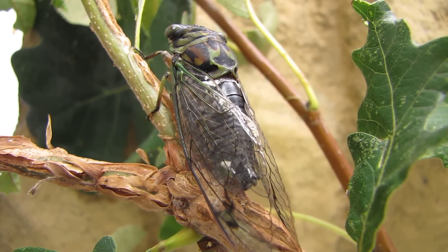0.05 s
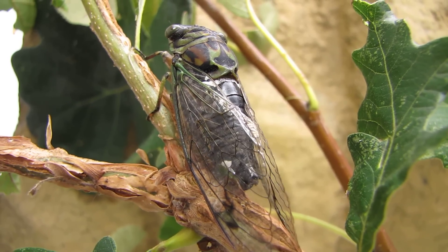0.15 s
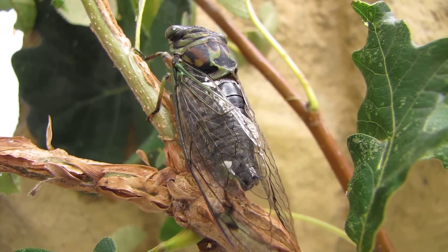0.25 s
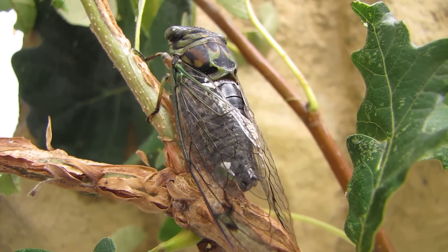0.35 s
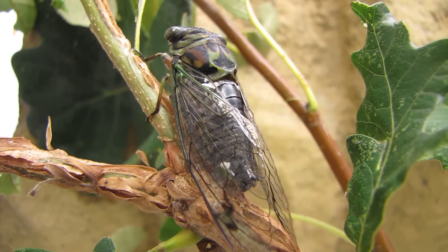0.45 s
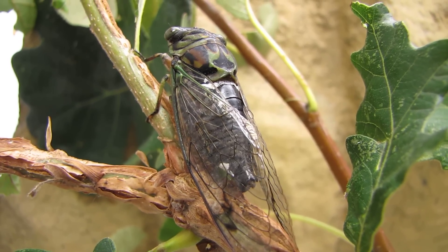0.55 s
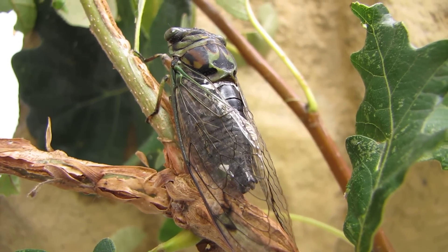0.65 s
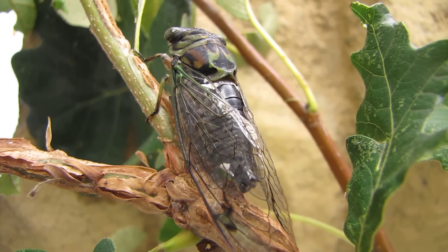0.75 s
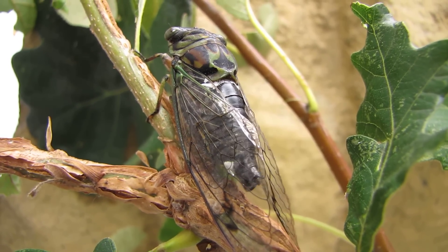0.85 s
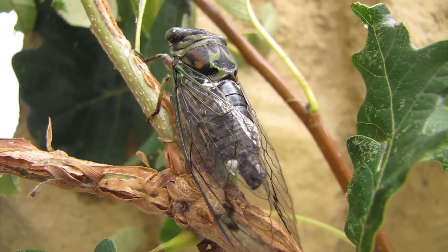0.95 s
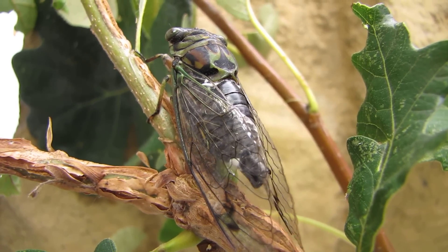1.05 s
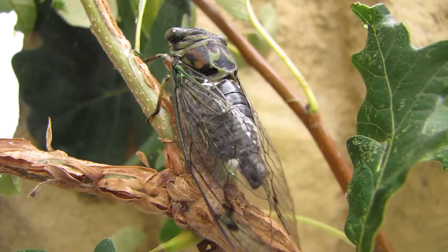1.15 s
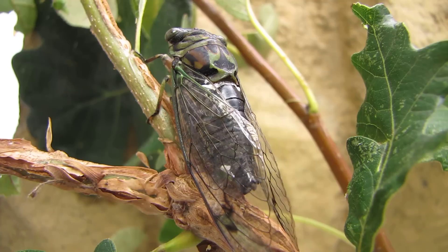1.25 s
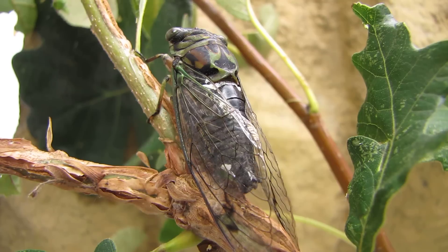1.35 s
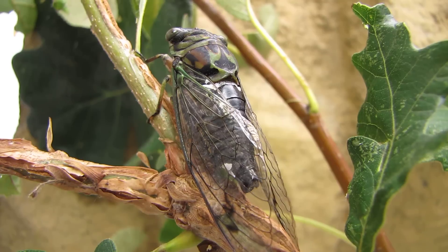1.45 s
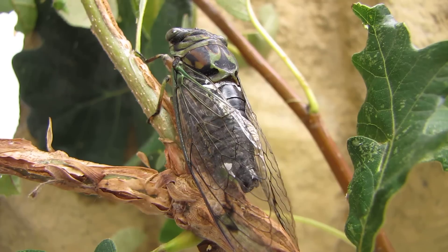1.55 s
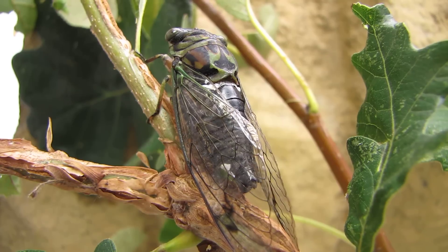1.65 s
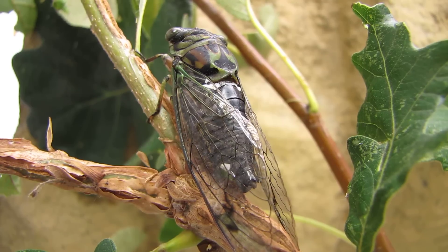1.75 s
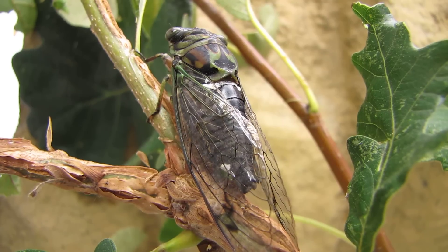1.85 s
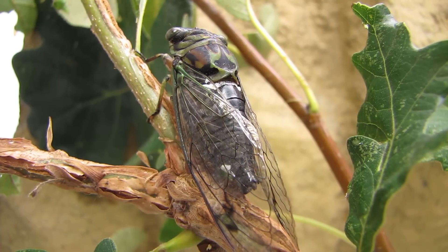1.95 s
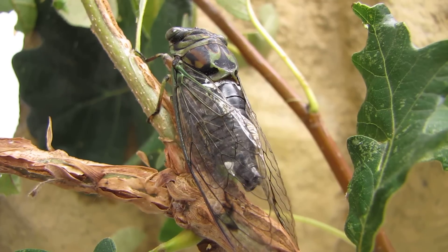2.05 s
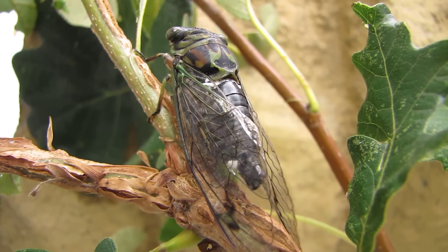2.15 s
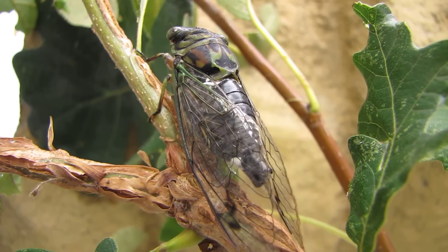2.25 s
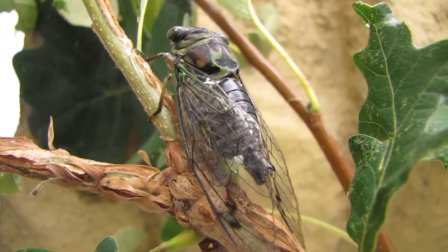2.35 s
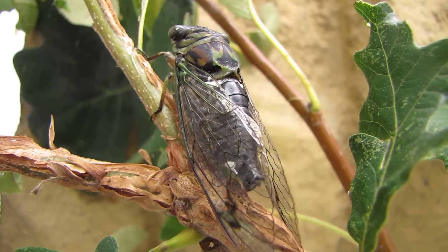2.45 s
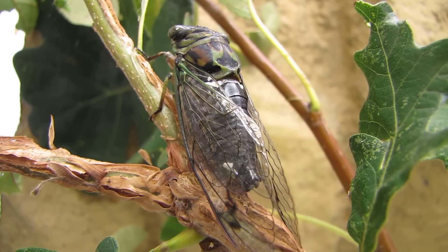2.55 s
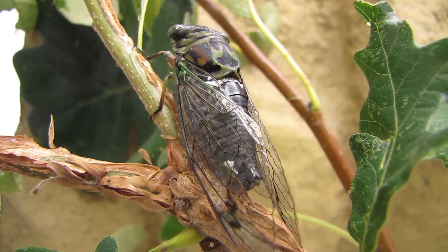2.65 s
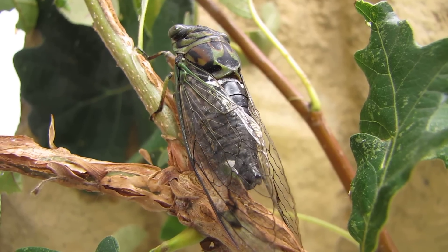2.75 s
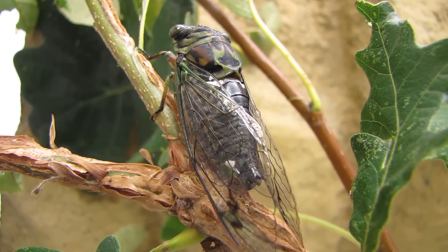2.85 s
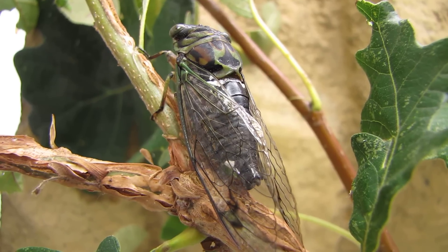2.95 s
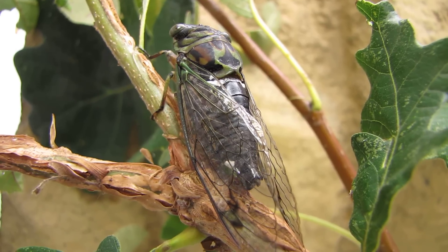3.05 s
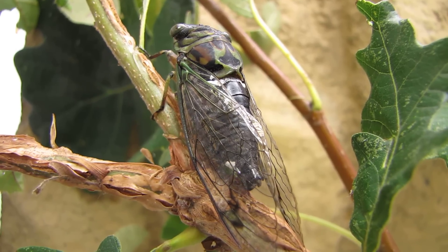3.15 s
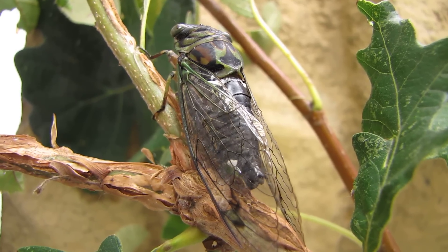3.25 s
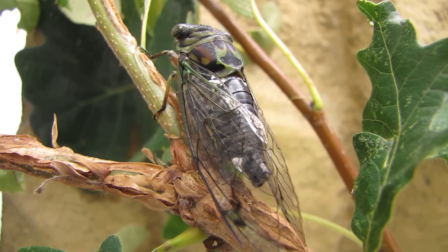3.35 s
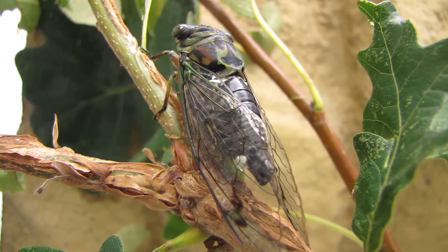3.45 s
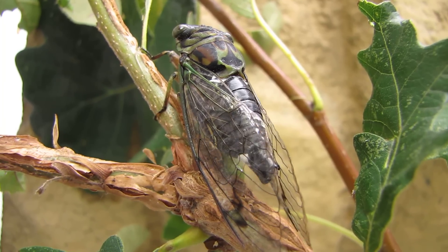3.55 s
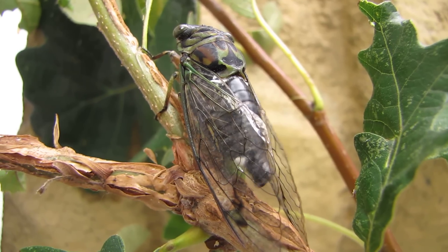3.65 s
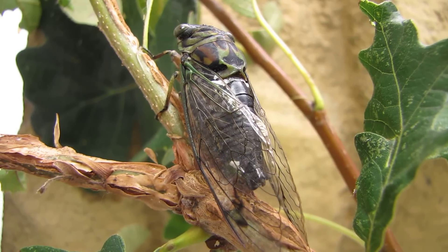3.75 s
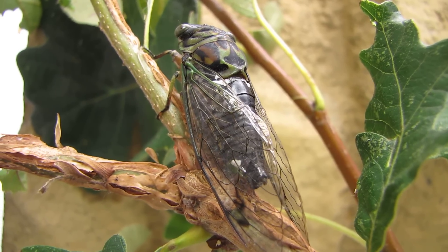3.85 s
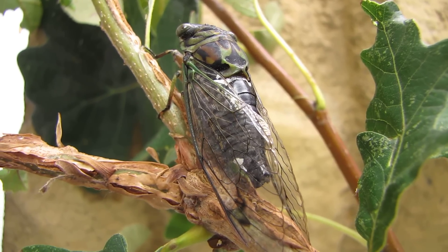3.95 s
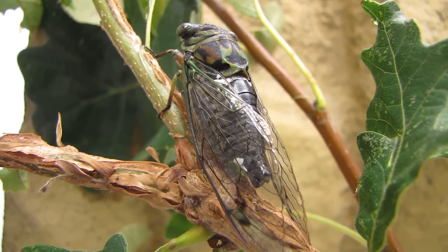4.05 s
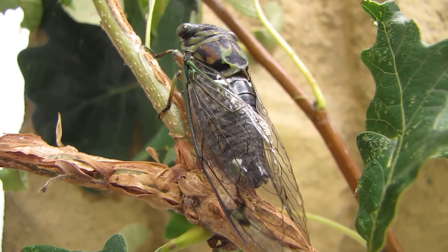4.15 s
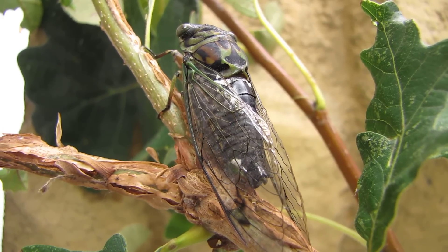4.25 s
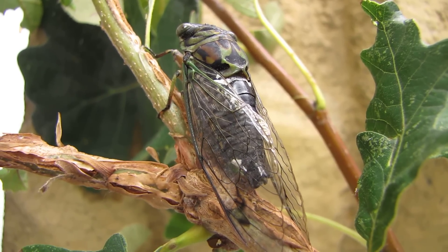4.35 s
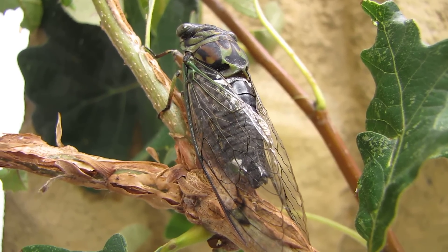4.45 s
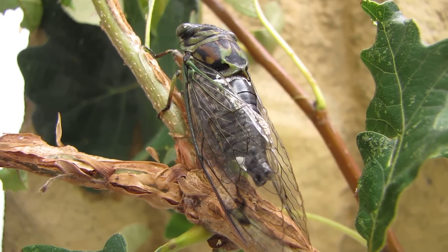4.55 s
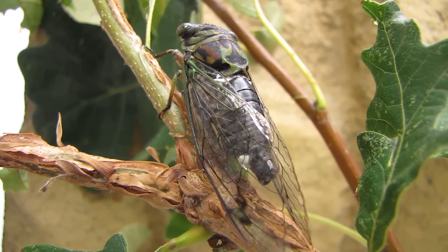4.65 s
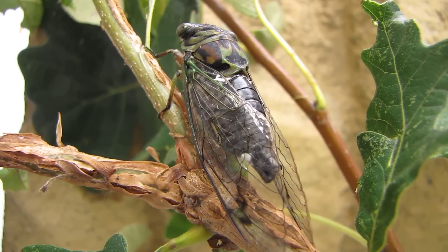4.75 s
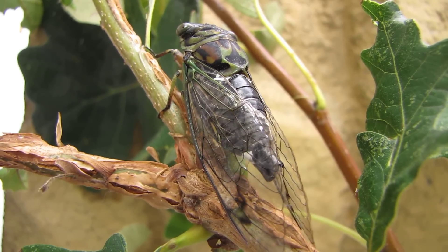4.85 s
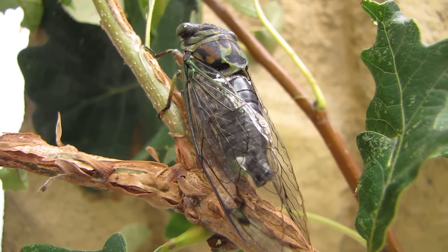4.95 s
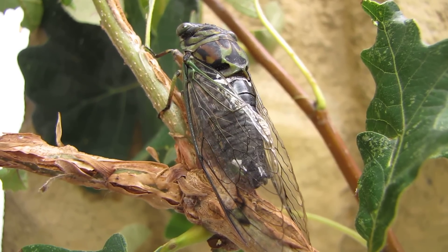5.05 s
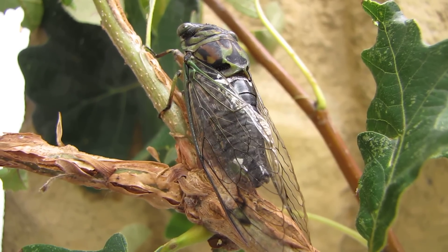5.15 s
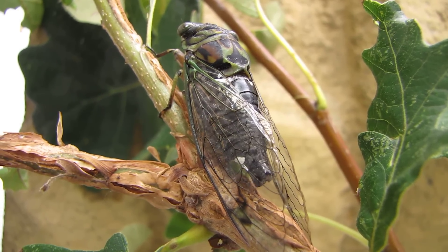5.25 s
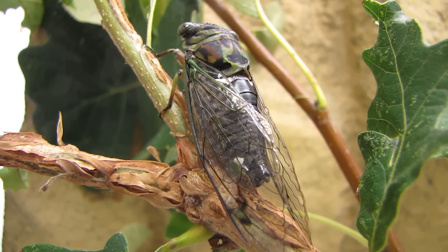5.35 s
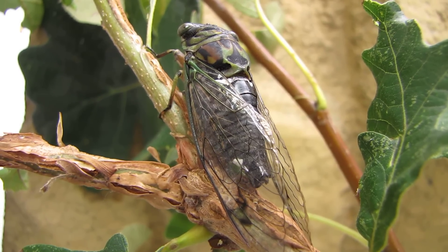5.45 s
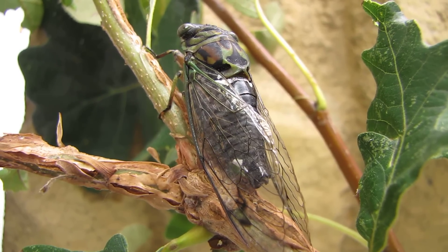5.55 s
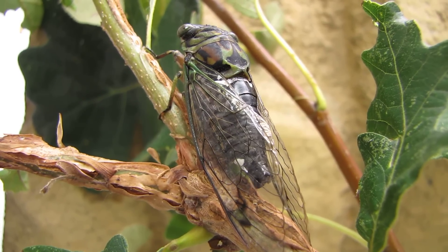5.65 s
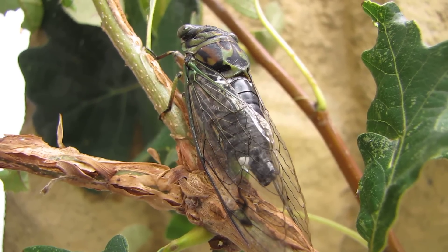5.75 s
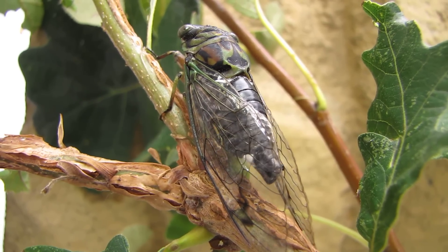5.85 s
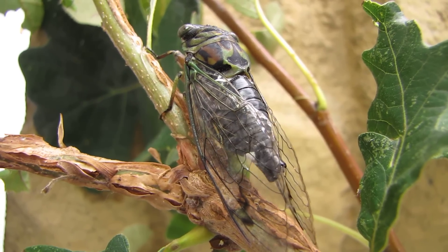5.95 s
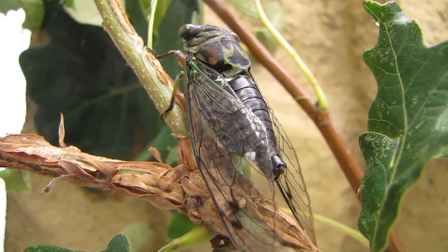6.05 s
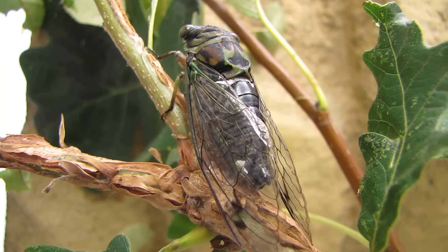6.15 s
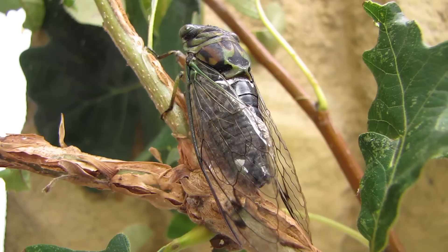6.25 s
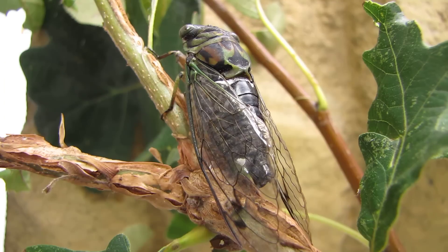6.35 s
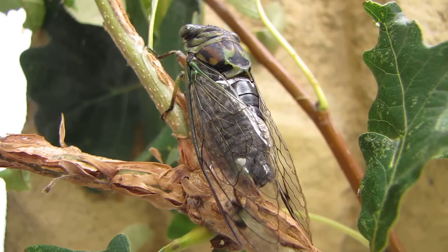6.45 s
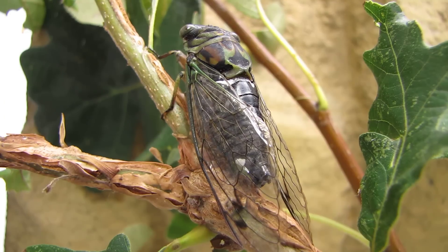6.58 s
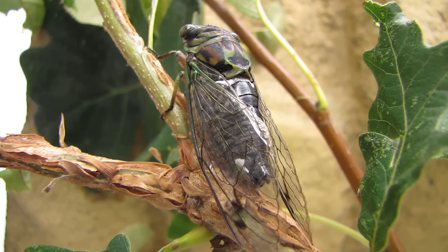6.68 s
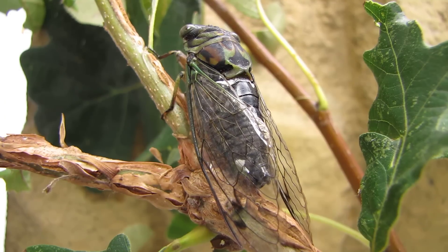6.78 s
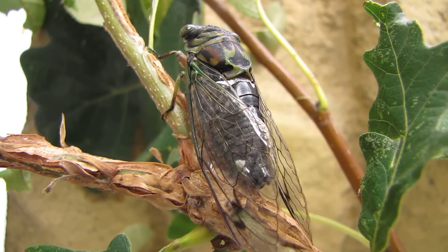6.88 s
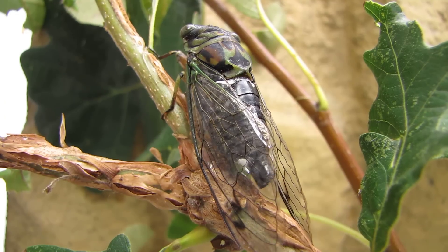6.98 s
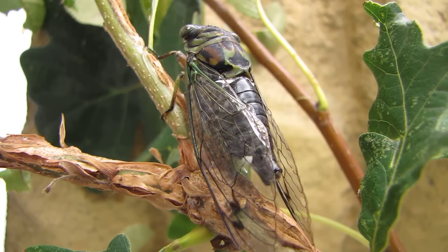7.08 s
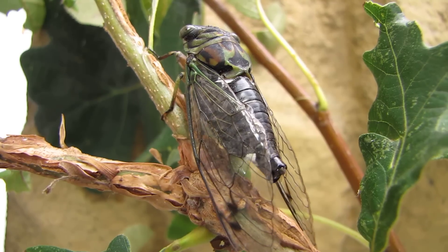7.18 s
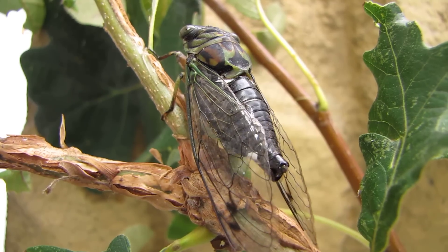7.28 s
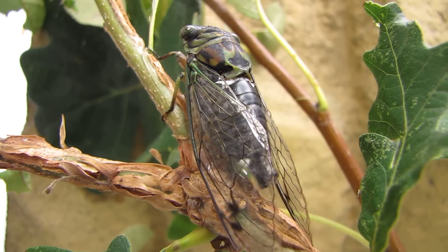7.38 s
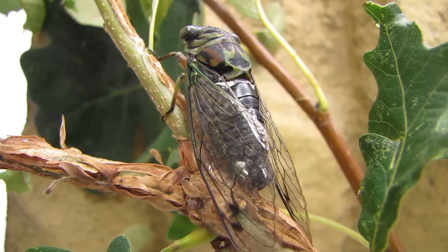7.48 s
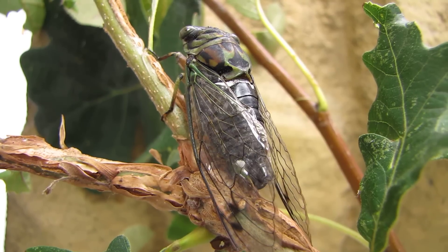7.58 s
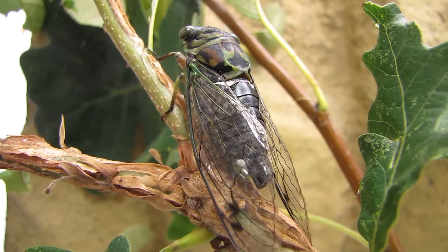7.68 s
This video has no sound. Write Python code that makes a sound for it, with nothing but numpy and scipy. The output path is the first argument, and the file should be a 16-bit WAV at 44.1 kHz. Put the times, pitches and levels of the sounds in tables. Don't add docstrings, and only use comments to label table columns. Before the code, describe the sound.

A close cicada sings six harsh, piercing phrases, each building from faint buzz to throbbing rattle, breaking off into slowing ticks.

```python
import sys
import numpy as np
from scipy import signal
from scipy.fft import rfft, irfft
from scipy.io import wavfile

SR = 44100
rng = np.random.default_rng(int(sys.argv[2]) if len(sys.argv) > 2 else 0)


def transcribe(u):
    v = np.clip(np.atleast_2d(u).T, -1, 1)
    q = np.round(v * 32767).astype(np.int16)
    wavfile.write(sys.argv[1], SR, q)


def undo_db(level):
    steps = np.asarray(level, float) / 20
    return 10 ** steps


N = 340452
TIME = np.arange(N) / SR

# (frequency [Hz], level per Hz [dB])
AIR_SPECTRUM = [(15, -9.5), (60, -4), (150, -8), (250, -7.5), (330, -14.5), (420, -24.5), (1000, -25),
                (1600, -37.5), (4000, -37.5), (9000, -48), (16000, -51)]
# (frequency [Hz], level [dB])
MACHINE_TONES = [(250, -72), (358, -85)]
# (start [s], length [s], pitch [Hz], level [dB])
DOVE_NOTES = [(-0.1, 0.39, 630, -86), (1.33, 0.39, 635, -85), (2.76, 0.41, 634, -84), (4.2, .36, 631, -82),
              (6.282, 0.15, 600, -80.5)]
# (start [s], length [s], first pitch [Hz], last pitch [Hz], level [dB])
SPARROW_CHIRPS = [(1.401, 0.15, 1850, 2250, -73), (1.447, .08, 2100, 2510, -76),
                  (2.63, .07, 1800, 2100, -85.5), (3.9, .1, 1500, 1393, -88),
                  (4.158, 0.16, 1855, 2300, -71), (6.511, 0.2, 1544, 2050, -76.5),
                  (6.59, 0.096, 2000, 2390, -76.5)]
# (start [s], pitch [Hz], level [dB])
CROW_CAW = (0.41, 120, -63)
# (frequency [Hz], width [Hz], level [dB])
THROAT_RESONANCES = [(680, 120, -1), (820, 240, 2), (1270, 250, -4.5), (1709, 260, -6.5), (2156, 200, -8.5)]
# (time [s], peak level [dB])
TWIG_SNAP = [(5.3368, -61)]

# (buzz starts [s], swell has risen [s], stroke count passes zero [s], swell breaks off [s],
# level [dB])
SONG_PHRASES = [(0.545, 0.839, 0.7621, 1.227, 0), (1.803, 2.078, 1.9966, 2.449, 0.5),
                (3.042, 3.326, 3.2558, 3.716, 0), (4.297, 4.574, 4.5297, 4.975, 0.5),
                (5.445, 5.717, 5.6372, 6.132, 0.5), (6.743, 7.02, 6.9655, 7.416, 0.54)]
# (time after count zero [s], strokes made so far [count])
MUSCLE_BEAT = [(-0.29, -20), (0, 0), (0.114, 8), (0.2233, 16), (0.3245, 24), (0.4225, 32), (0.5455, 42)]
# (delay [ms], level [dB], tilt [dB per octave])
STROKE_RIBS = [(0, 1.5, -4.5), (2.1, 0.5, -4.0), (4.2, -1.5, -1.5), (6.2, -6.0, 4.0), (8.3, -6.0, 2.5),
               (10.3, -7.0, 5.0), (12.2, -13.0, 3.0)]
# (delay [ms], level [dB], tilt [dB per octave])
BUCKLE_RIBS = [(0, 0.5, -2.0), (1.1, -3.5, 1), (2.198, -2, -2), (4.2, -15.5, 6), (5.5, -13.5, -4.5)]
# (time [s], peak level [dB])
OPENING_TICKS = [(0.5386, -32), (1.7726, -33.5), (1.7827, -32), (1.7924, -31), (3.0033, -33), (3.0173, -36),
                 (3.0282, -33), (4.2772, -31), (5.4221, -31.5), (6.7145, -34.5), (6.7251, -37),
                 (6.7353, -36)]
# (first tick [s], second tick [s], last tick [s], loss per tick [dB], doubled ticks [count])
CLOSING_RUNS = [(-0.04, -0.0188, 0.1087, 5.5, 2), (1.2296, 1.2486, 1.3745, 4.5, 3),
                (2.456, 2.4724, 2.6231, 3.5, 3), (3.7153, 3.7367, 3.8392, 4.5, 3),
                (4.9916, 5.0126, 5.1385, 4, 2), (6.134, 6.1568, 6.2571, 3.5, 2),
                (7.4132, 7.4334, 7.5561, 3.5, 3)]
# (frequency [Hz], width [Hz], level when loud [dB], level when soft [dB], #
# left-right [dB], left phase lead [rad])
BELLY_RESONANCES = [(1180, 590, -13, -19.5, 0, -1.33), (1660, 290, -16.5, -16, -6, -0.65),
                    (2300, 370, -12.5, -17, -2, 2.0), (2770, 290, -13, -15, -4.5, -0.55),
                    (3295, 280, -14.5, -7, 4.5, 0.96)]
UPPER_RESONANCES = [(3806, 150, -1, -8.5, -4, -0.0), (4112, 134, 3, -15, 5.5, -0.7),
                    (4635, 160, 1.5, -3, -8, 1.18), (5165, 356, 3, 1.5, 0.5, 0.5), (5692, 120, 3, 2, -6, -2),
                    (6025, 164, 9.5, 6.5, -3.5, 1.5), (6216, 240, 3, 1, 2, 1.0), (6905, 140, 3, 4, 4.5, 1.26),
                    (7160, 160, 5, 4, -3, -1.5), (7615, 190, 6, 3, -0.5, -1.66),
                    (8044, 710, -4, -1.5, 4.5, 2), (8535, 150, 4, 6.5, -2.5, 1.99),
                    (8902, 160, -4, 5, 8.5, 1.6), (9310, 96, -10, -2, 9, 2.5),
                    (9520, 110, -17.5, 0.5, 2.5, 0), (10600, 740, -21, -1.5, 3, 3),
                    (11670, 730, -19.5, 0.5, 5.5, 1.5), (11550, 330, -25, -4, -4, -0.7),
                    (11770, 600, -20, -5.5, -0.5, 1), (13500, 1800, -25, -16, 2.5, 2),
                    (14500, 530, -26.5, -23, -3, 2.5), (16000, 790, -26.5, -25, -1, 2)]

SOFT_DB, LOUD_DB = -42, -16


def rms_one(x):
    return x / np.sqrt(np.mean(x ** 2) + 1e-20)


def curve(tables, silent):
    out = np.full(N, float(silent))
    for rows in tables:
        s, value = np.array(rows)[:, 0], np.array(rows)[:, 1]
        inside = (TIME >= s[0]) & (TIME <= s[-1])
        out[inside] = np.interp(TIME[inside], s, value)
    return out


def drift(rate):
    knots = rng.standard_normal(int(N / SR * rate) + 3)
    return 1.2 * np.interp(TIME * rate, np.arange(len(knots)), knots)


def ring(clicks, hz, width_hz):
    r = np.exp(-np.pi * width_hz / SR)
    return signal.lfilter([1 - r], [1, -r * np.exp(2j * np.pi * hz / SR)], clicks + 1e-18)


def bandpass(x, order, low_hz, high_hz):
    return signal.sosfilt(signal.butter(order, [low_hz, high_hz], "band", fs=SR, output="sos"), x)


def air():
    hz = np.fft.rfftfreq(N, 1 / SR) + 1
    shape_hz, shape_db = np.transpose(AIR_SPECTRUM)
    gain = undo_db(np.interp(np.log(hz), np.log(shape_hz), shape_db))
    noise = irfft(rfft(rng.standard_normal((2, N))) * gain, N)
    hum = np.zeros(N)
    for tone_hz, db in MACHINE_TONES:
        level = undo_db(db + 6.1 * drift(25))
        hum += level * np.sin(2 * np.pi * tone_hz * TIME + 0.42 * drift(7.2))
    return undo_db(-64.5) * rms_one(noise) + hum


def dove():
    fade_s, sag_s, sag_over_s, sag_hz = 0.044, 0.129, 0.065, 55
    notes = np.transpose(DOVE_NOTES)
    latest = np.searchsorted(notes[0], TIME) - 1
    s, length, hz, level_db = notes[:, latest]
    left = s + length - TIME
    pitch = hz - sag_hz * np.clip((sag_s - left) / sag_over_s, 0, 1)
    fade = np.clip(np.minimum(TIME - s, left) / fade_s, 0, 1)
    level = undo_db(level_db + 7.0 + 4.3 * drift(25))
    return level * fade * np.sin(2 * np.pi * np.cumsum(pitch) / SR)


def sparrows():
    out, flutter = np.zeros(N), undo_db(2.0 * drift(200))
    voices = []
    for ratio in (1, 1.17):
        bend = ratio * undo_db(0.2 * drift(220))
        grit = 1.07 + 0.41 * drift(400)
        voices.append((bend, grit))
    for s, length, from_hz, to_hz, level_db in SPARROW_CHIRPS:
        span = slice(int(s * SR), int((s + length) * SR))
        part = np.linspace(0, 1, span.stop - span.start)
        glide = from_hz + (to_hz - from_hz) * part ** .7
        swell = undo_db(level_db) * np.sin(np.pi * part)
        for bend, grit in voices:
            phase = 2 * np.pi * np.cumsum(glide * bend[span]) / SR
            octave = 1.9 * (1 - part) ** 1.2 * np.sin(2 * phase)
            out[span] += swell * (np.sin(phase) + octave) * grit[span]
    return out * flutter


def caw():
    attack_s, hold_s, release_s, depth_db = 0.061, 0.073, 0.15, 16
    s, pitch_hz, level_db = CROW_CAW
    cycles = np.cumsum(pitch_hz * undo_db(drift(60)) / SR)
    pulses = np.diff(cycles % 1, prepend=0) < 0
    source = rms_one(pulses - pulses.mean()) + 0.98 * rng.standard_normal(N)
    voice = sum(undo_db(db) * ring(source, hz, width).imag for hz, width, db in THROAT_RESONANCES)
    voice = bandpass(voice, 3, 540, 2300)
    corners = s + np.cumsum([0, attack_s, hold_s, release_s])
    shape = np.c_[corners, level_db - depth_db * np.array([1, 0, 0, 1])]
    return rms_one(voice) * undo_db(curve([shape], silent=-120) + 3.0)


def snap():
    s, peak_db = TWIG_SNAP[0]
    age = np.maximum(TIME - s, 0)
    crack = rng.standard_normal(N) * (age > 0) * undo_db(peak_db + 5.0 - 60 * age / 0.033)
    return bandpass(crack, 1, 700, 4500)


def song():
    rise_s, fill_s, break_s = 0.094, 0.18, 0.031
    phrases = []
    for start, risen, _, end, db in SONG_PHRASES:
        phrases.append([(start, -43 + db), (risen - rise_s, -37 + db),
                        (risen, -18.5 + db), (risen + fill_s, -12.5 + db),
                        (end - break_s, -12.5 + db), (end, -25.5 + db)])
    return phrases


def lone_ticks():
    gap_s, from_db, floor_db = .025, -9, -27
    twin_s, twin_loss_db = .0056, 1.5
    rows = list(OPENING_TICKS)
    for first, second, last, loss_db, doubled in CLOSING_RUNS:
        count = round((last - second) / gap_s) + 1
        for k, s in enumerate([first, *np.linspace(second, last, count)]):
            db = max(from_db - loss_db * k, floor_db)
            rows.append((s, db))
            if k < round(doubled):
                rows.append((s + twin_s, db - twin_loss_db))
    return [row for row in rows if row[0] > 0]


def ribs(starts, level_db, effort, pattern, jitter_ms):
    delay_ms, rib_db, tilt = np.transpose(pattern)
    jitter = jitter_ms * rng.standard_normal((len(starts), len(pattern)))
    s = starts[:, None] + (delay_ms + jitter) / 1000
    clicks = np.broadcast_arrays(s, level_db[:, None] + rib_db, tilt, effort[:, None])
    return np.stack(clicks).reshape(4, -1)


def tymbals():
    level = curve(song(), silent=-200)
    effort = np.clip((level - SOFT_DB) / (LOUD_DB - SOFT_DB), .001, .999)
    beats = [np.add(MUSCLE_BEAT, (phrase[2], 0)) for phrase in SONG_PHRASES]
    strokes = np.flatnonzero(np.diff(np.floor(curve(beats, silent=.5))) == 1)
    buckle_count = np.cumsum(265 * undo_db(.5 * drift(30)) / SR)
    buckles = np.flatnonzero(np.diff(buckle_count % 1) < 0)

    stroke_db = level[strokes] + 20 * np.log10(effort[strokes]) + 1.0
    buckle_db = level[buckles] + 10 * np.log10(1 - effort[buckles] ** 2) - 0.5
    swell = ribs(strokes / SR, stroke_db, effort[strokes], STROKE_RIBS, jitter_ms=.05)
    buzz = ribs(buckles / SR, buckle_db, effort[buckles], BUCKLE_RIBS[::2], jitter_ms=.08)

    s, peak_db = np.transpose(lone_ticks())
    tick_effort = np.clip((peak_db - 6.0 - SOFT_DB) / (LOUD_DB - SOFT_DB), 0, 1)
    tick_effort[:len(OPENING_TICKS)] = 0
    ticks = ribs(s, peak_db - 9.5, tick_effort, BUCKLE_RIBS, jitter_ms=0.11)
    return np.hstack([swell, buzz, ticks])


def cicada():
    s, click_db, tilt, effort = tymbals()
    body = BELLY_RESONANCES + UPPER_RESONANCES
    hz, width, loud_db, soft_db, pan_db, lead = np.transpose(body)[:, :, None]
    belly = hz < 3200

    slack_db = -21.5 * effort ** 0.62 * (2200 / hz) ** .3
    tighten_db = -11 * (hz < 2000) * np.minimum(effort / 0.23, 1)
    colour_db = soft_db + effort ** 1.5 * (loud_db - soft_db)
    colour = undo_db(colour_db + belly * (5.0 + slack_db + tighten_db))
    colour = colour / np.sqrt(np.sum(colour ** 2 * width, axis=0))
    chance_db = 1.6 * rng.standard_normal(colour.shape[::-1]).T
    strength = colour * undo_db(click_db + 70.5 + tilt * np.log2(hz / 6300) + chance_db)

    late = .0007 * rng.random(hz.shape) + .000022 * rng.standard_normal(colour.shape[::-1]).T
    at = np.clip(((s + late) * SR).astype(int), 0, N - 1)
    start = rng.uniform(0, 2 * np.pi, len(hz))
    out = np.zeros((2, 2, N))
    for k in range(len(hz)):
        tone = ring(np.bincount(at[k], strength[k], N), hz[k, 0], .9 * width[k, 0])
        for side, sign in enumerate((.5, -.5)):
            turned = tone * np.exp(1j * (start[k] + sign * lead[k]))
            out[int(belly[k, 0]), side] += undo_db(sign * pan_db[k]) * np.imag(turned)

    high = signal.sosfilt(signal.butter(7, 3450, "high", fs=SR, output="sos"), out[0])
    return high + bandpass(out[1], 3, 900, 3600)


def leaves(x):
    t = np.arange(2200) / SR
    echoes = rng.standard_normal((2, len(t))) * undo_db(-60 * t / .022) * (t > .0015)
    return x + undo_db(-28) * signal.fftconvolve(x, echoes, axes=1)[:, :N]


def scene():
    far = dove() + sparrows() + caw() + snap()
    return leaves(cicada() + far) + air()


def roll_off(x):
    return signal.sosfilt(signal.butter(12, 16500, fs=SR, output="sos"), x)


def record(dry):
    top = 0.48 + np.sign(dry) * [[.03], [-.012]]
    bent = dry / (1 + np.abs(dry / top) ** 6.5) ** (1 / 6.5)
    bent = signal.sosfilt(signal.butter(1, 30, "high", fs=SR, output="sos"), bent)
    bent = signal.sosfilt(signal.cheby2(12, 60, 16100, fs=SR, output="sos"), bent)
    return roll_off(bent)


dry = scene()
out = record(dry)
transcribe(out)
```